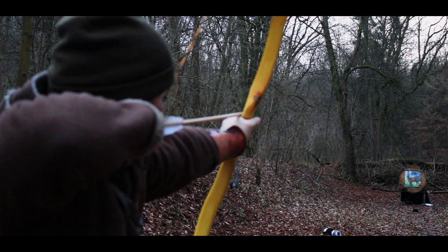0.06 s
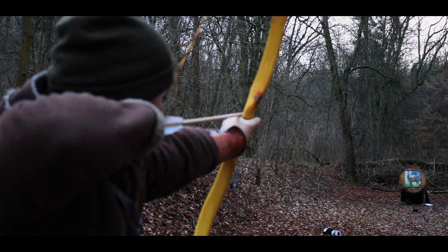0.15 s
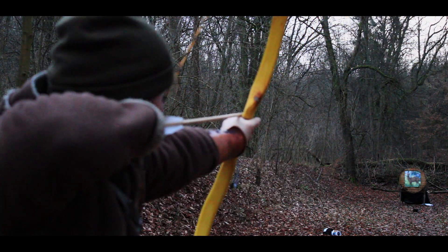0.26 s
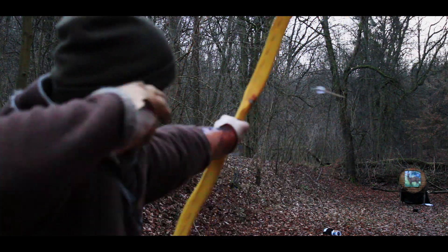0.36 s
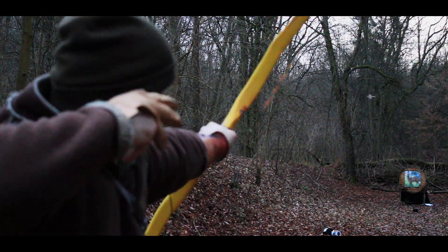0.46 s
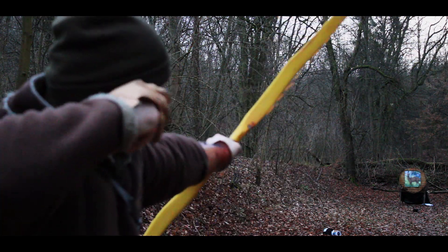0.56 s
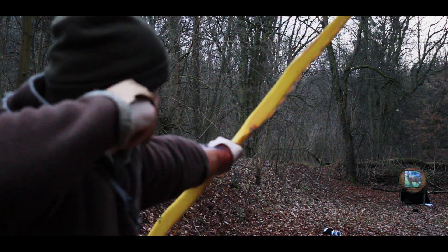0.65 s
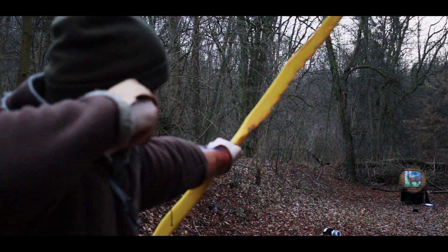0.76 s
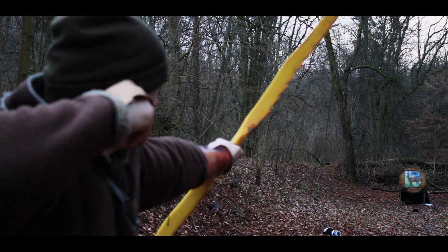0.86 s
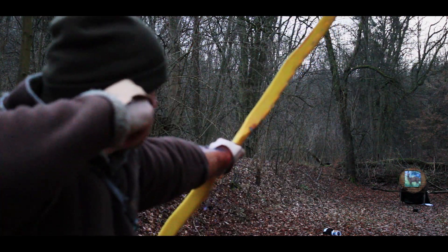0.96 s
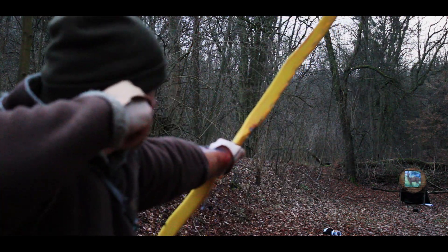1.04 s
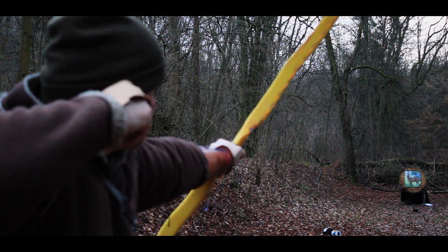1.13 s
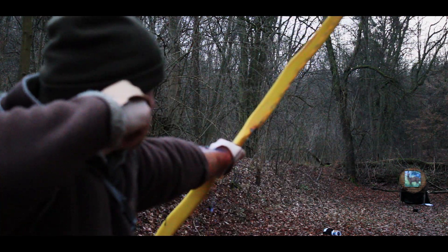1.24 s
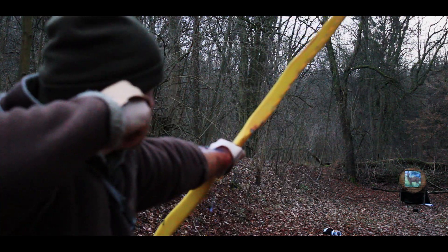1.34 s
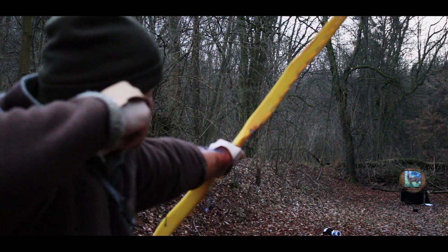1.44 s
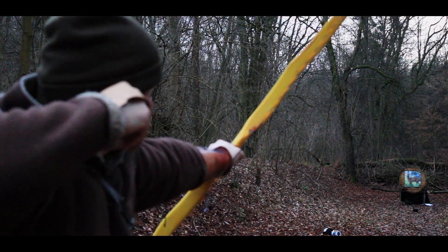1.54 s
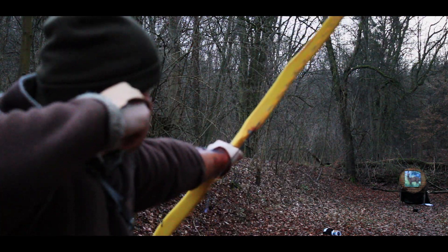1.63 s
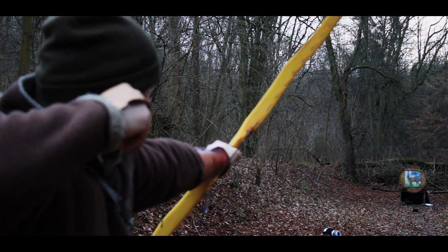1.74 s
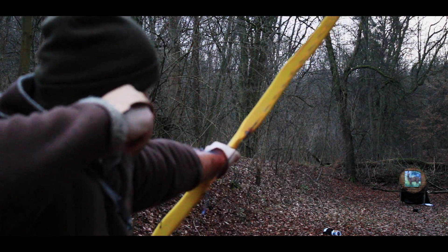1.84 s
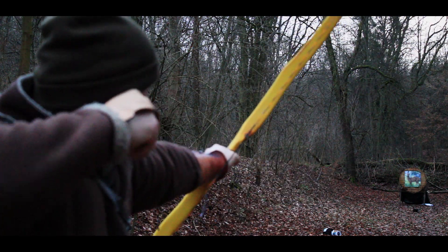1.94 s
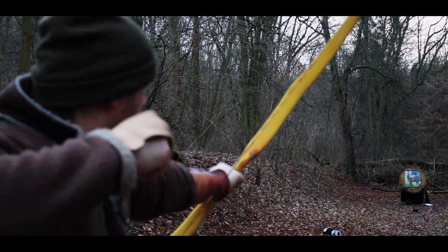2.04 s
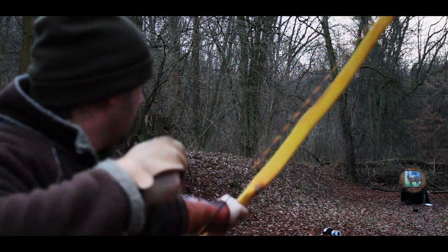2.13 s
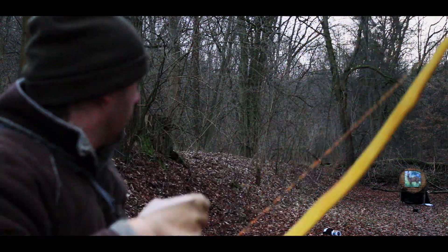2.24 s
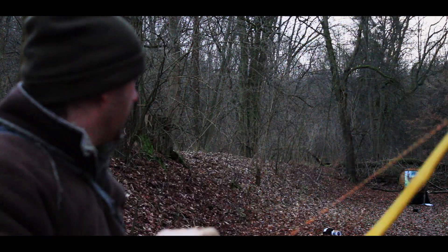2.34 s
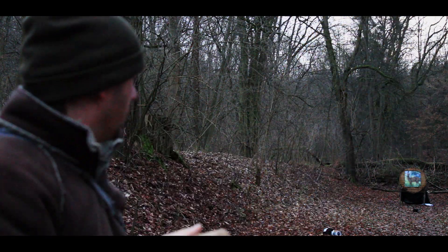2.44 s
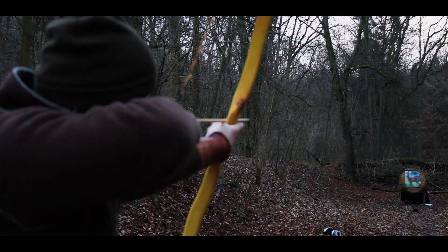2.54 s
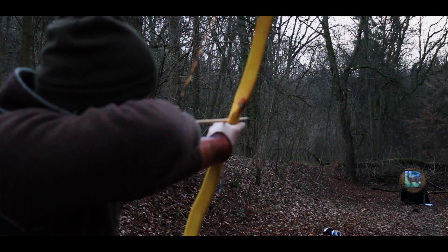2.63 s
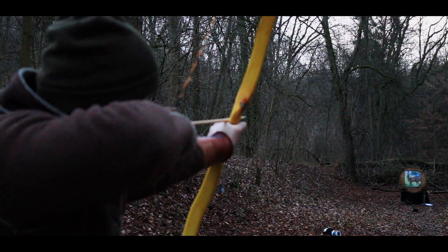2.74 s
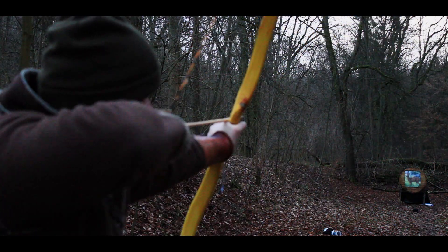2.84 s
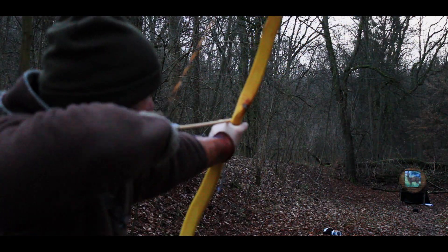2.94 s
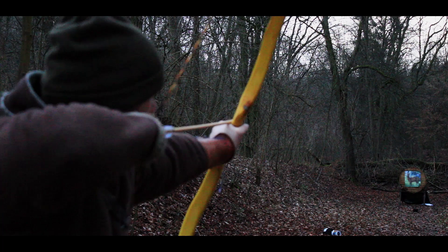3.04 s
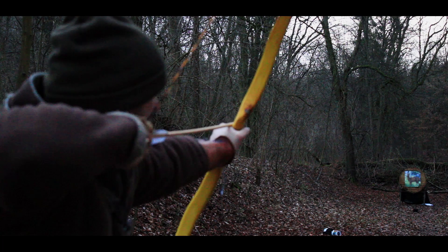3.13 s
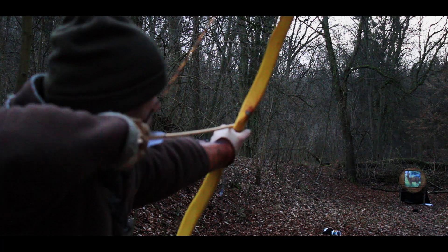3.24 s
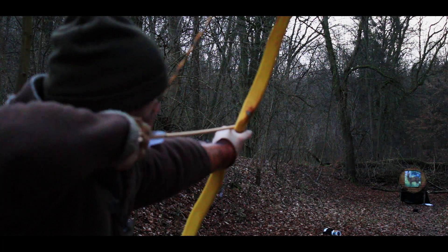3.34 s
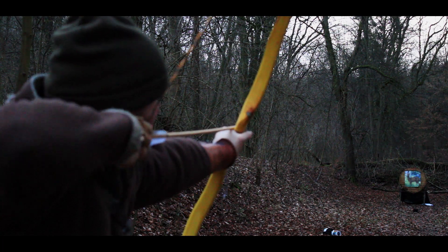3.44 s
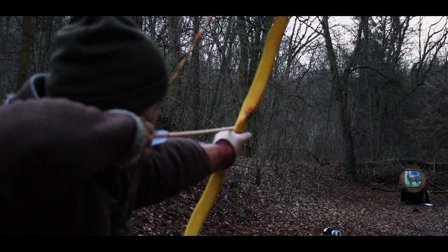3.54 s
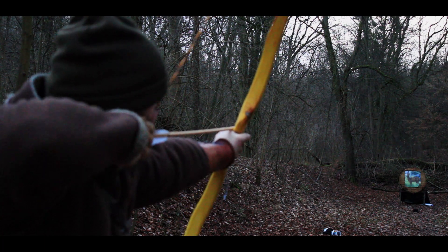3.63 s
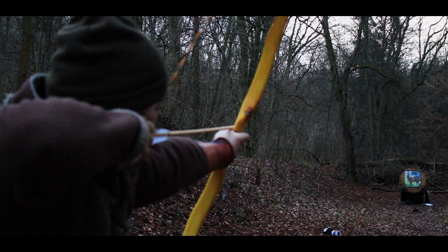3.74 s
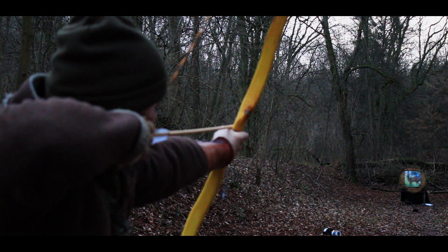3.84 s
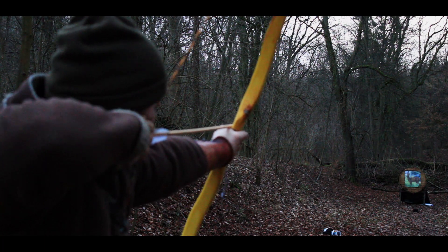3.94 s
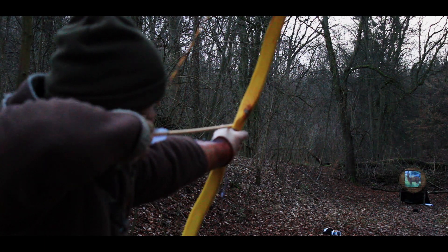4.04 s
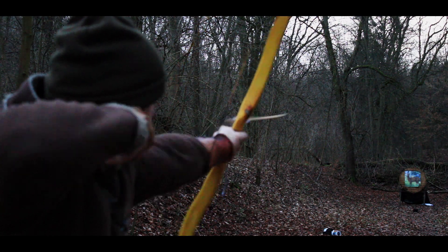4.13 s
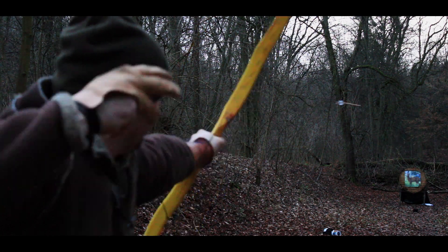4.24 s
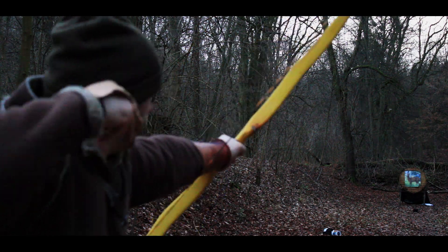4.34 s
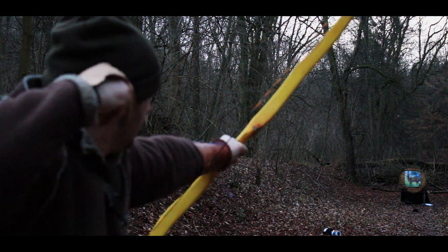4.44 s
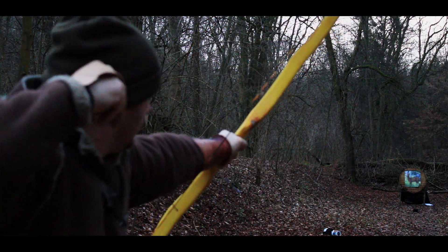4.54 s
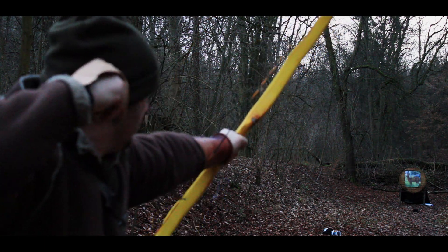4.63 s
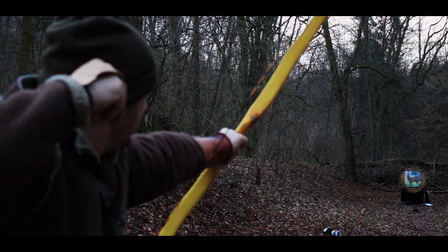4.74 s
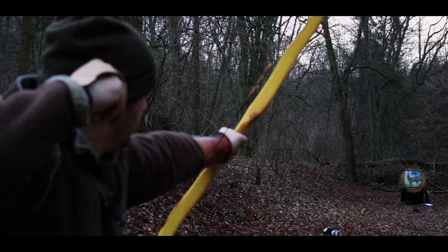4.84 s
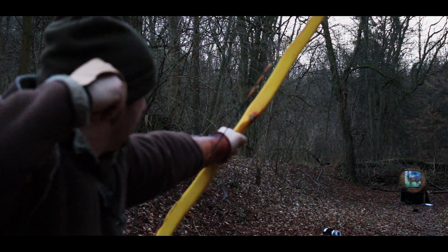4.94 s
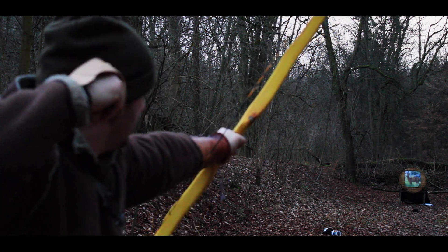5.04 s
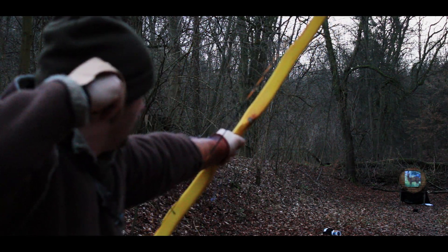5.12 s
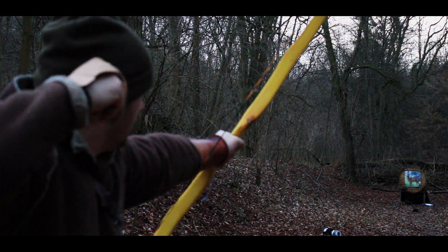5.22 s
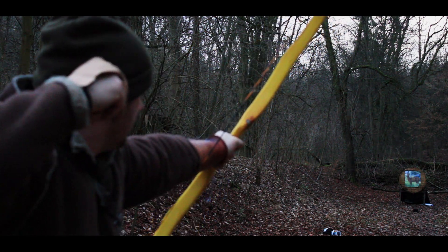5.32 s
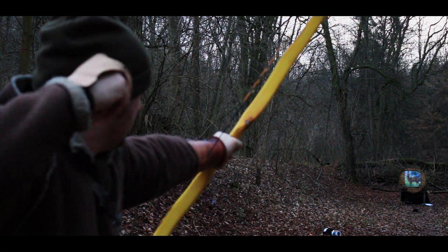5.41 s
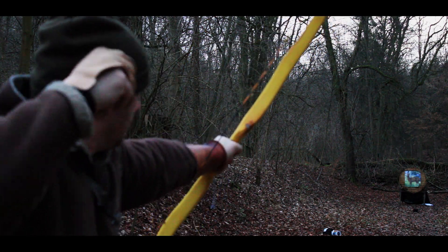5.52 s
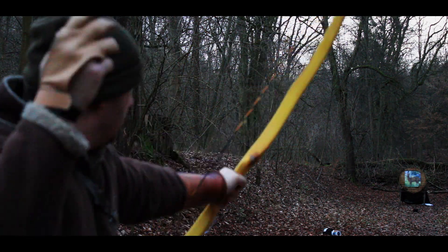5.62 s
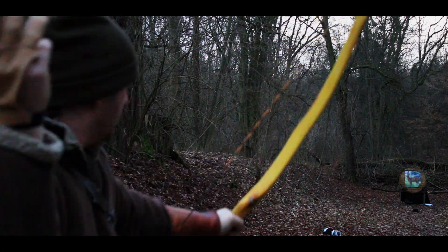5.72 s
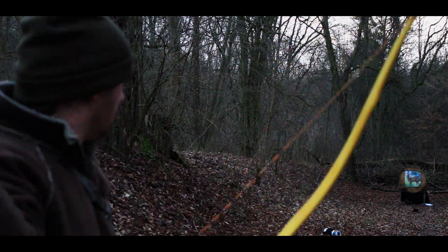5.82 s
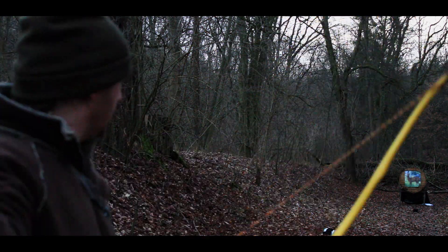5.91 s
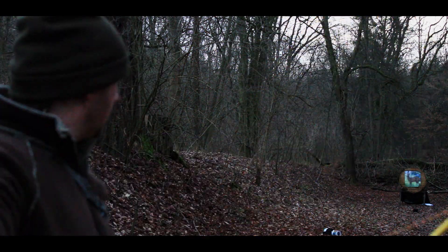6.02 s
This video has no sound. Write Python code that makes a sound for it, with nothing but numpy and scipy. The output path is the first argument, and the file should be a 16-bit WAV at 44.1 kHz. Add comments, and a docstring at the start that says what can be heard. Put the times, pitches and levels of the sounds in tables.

```python
"""An archer in a quiet winter forest, close to the microphone, shoots two arrows from a wooden bow.
Faint ticks and a light breeze lead to the first shot: the string slips off the glove (noise burst, ringing modes),
slaps home and rebounds. Low puffs of wind follow; a second later the arrow knocks into a far target (coloured
clicks), a slope and the trees echo it, and the shaft's thin ring lingers (blurred sine). Clicks and a soft rustle
of the jacket lead to the second shot; cloth and clicks, a second knock, a far bird's whistle (blurred sine), then
clacking spare arrows and rustling cloth close it."""
import sys
import numpy as np
from scipy import signal
from scipy.fft import rfft, irfft, next_fast_len
from scipy.io import wavfile
from scipy.ndimage import uniform_filter1d

SR = 44100
rng = np.random.default_rng(int(sys.argv[2]) if len(sys.argv) > 2 else 0)


def generate_wav(sig):
    """Save sig (samples, or channels by samples) to the path in sys.argv[1] as 16-bit PCM at SR."""
    pcm = np.round(np.clip(np.atleast_2d(sig).T, -1, 1) * 32767).astype(np.int16)
    wavfile.write(sys.argv[1], SR, pcm)


N = 267687
TIME = np.arange(N) / SR


def amp(db):
    """Turns dB into an amplitude factor."""
    return 10 ** (np.asarray(db) / 20)


def read(points, hz):
    """Reads a table joined by straight lines on a log-frequency axis."""
    f, value = np.transpose(points)
    return np.interp(np.log(hz + 1), np.log(f), value)


def add(mix, s, sound):
    """Lays a sound into the mix at time s."""
    part = mix[round(s * SR):][:len(sound)]
    part += sound[:len(part)]


def noise(spectrum):
    """Noise of rms 1 with the given colour."""
    size = next_fast_len(N)
    gain = amp(read(spectrum, np.fft.rfftfreq(size, 1 / SR)))
    x = irfft(rfft(rng.standard_normal(size)) * gain, size)[:N]
    return x / x.std()


def drift(rate_hz):
    """A random wander: normal draws, rate_hz of them a second, joined by straight lines."""
    knots = rng.standard_normal(N // 8)
    return np.interp(TIME * rate_hz, np.arange(len(knots)), knots)


def swell(s, rise, fall):
    """An envelope that grows exponentially to 1 at time s and dies away; time constants in seconds."""
    return np.exp(-np.maximum((s - TIME) / rise, (TIME - s) / fall))


def hump(s, half):
    """A bell-shaped envelope that peaks at 1 at time s and is down to 1/e half a length away."""
    return np.exp(-((TIME - s) / half) ** 2)


def ring(modes, pitch=1):
    """Modes of a solid body, each a sine that decays after one blow."""
    t = TIME[:SR // 4]
    return sum(amp(db - 60 * t / t60) * np.sin(2 * np.pi * hz * pitch * t) for hz, db, t60 in modes)


def pulse(spectrum, tilt_db, size=4096):
    """A causal (minimum-phase) click of energy 1 with the given colour, tilted in dB an octave."""
    hz = abs(np.fft.fftfreq(size, 1 / SR))
    log_gain = np.log(amp(read(spectrum, hz) + tilt_db * np.log2((hz + 100) / 1500)))
    x = np.fft.ifft(np.exp(np.conj(signal.hilbert(log_gain)))).real
    return x / np.linalg.norm(x)


# Colour of the scatter from the trunks. Each row: frequency in Hz, level in dB.
TRUNK_COLOUR = [(100, 3), (400, 3), (1200, 2), (2400, 0), (3300, 2.5), (4500, 1.5), (7000, 1), (14000, -2)]
# How long the scatter lasts. Each row: frequency in Hz, time to fall by 60 dB in seconds.
TRUNK_T60 = [(100, 0.53), (600, 1.76), (1500, 1.37), (3500, 1.01), (7000, 0.92), (14000, 0.2)]


def forest(x, build_s, bright_db, bank_s, bank_db, bank_width_s, lumpy_db):
    """Countless trunks scatter the sound into an even wash; a bank behind them returns a broad swell."""
    hz, t, z = signal.stft(x, SR, nperseg=256)
    power = uniform_filter1d(abs(z) ** 2, size=5, axis=0)
    lag = t[t < 1]
    bank = amp(bank_db) * np.exp(-((lag - bank_s) / bank_width_s) ** 2)
    arrivals = (1 - np.exp(-lag / build_s)) * (1 + bank)
    colour_db = read(TRUNK_COLOUR, hz) + bright_db * np.log2(1 + hz / 3000)
    fall_db = 60 * lag / read(TRUNK_T60, hz)[:, None]
    decay = (arrivals * amp(colour_db[:, None] - fall_db)) ** 2
    # the power is smeared over time, then carried by fresh noise
    wash = abs(signal.fftconvolve(power, decay / decay.sum(1).max(), axes=1)[:, :len(t)])
    grain = signal.stft(rng.standard_normal(N) * amp(lumpy_db * drift(300)), SR, nperseg=256)[2]
    return signal.istft(np.sqrt(wash) * grain / grain.std(), SR, nperseg=256)[1][:N]


# Colour of the far hush. Each row: frequency in Hz, relative level in dB per Hz.
HUSH = [(12, -49.5), (20, -14.5), (65, -2), (116, -3.5), (187, -8), (319, -7.5), (738, -12.5), (825, -13.5),
        (1000, -14.5), (1370, -17.5), (1710, -23), (3160, -26.5), (8650, -35.5), (14300, -50), (16000, -62)]
HUSH_DB = -46
# Spells of light, uneven breeze. Each row: middle in seconds, level in dB, half length in seconds.
BREEZE_SPELLS = [(.15, -45, 0.38), (1.71, -51.5, 0.59)]
# The strongest puffs of wind on the microphone. Each row: middle in seconds, level in dB.
WIND_PUFFS = [(1.163, -35), (1.345, -31.5), (1.645, -39.5), (1.972, -34.5), (2.13, -42)]
PUFF_HALF_S = 0.03
# Low colour of wind on the microphone. Each row: frequency in Hz, level in dB.
BUFFET_COLOUR = [(15, 3.5), (40, -1.5), (80, 1.5), (150, -8), (250, -14.5), (600, -66), (3000, -66)]


def air(swell_db=-0.89, lumpy_db=4, lumps_hz=18):
    """The far hush of the woods wavers slightly; wind buffets the microphone in lumpy spells and low puffs."""
    breeze = sum(amp(db) * hump(s, half) for s, db, half in BREEZE_SPELLS)
    breeze = breeze * amp(lumpy_db * drift(lumps_hz))
    puffs = sum(amp(db) * hump(s, PUFF_HALF_S) for s, db in WIND_PUFFS)
    hush = amp(HUSH_DB + swell_db * drift(4.19)) * noise(HUSH)
    return hush + np.hypot(breeze, puffs) * noise(BUFFET_COLOUR)


# Thin far tones: the first row is the arrow shaft's faint ring lingering among the trees, the second a far bird.
# Each row: middle in seconds, pitch in Hz, level in dB, half length in seconds.
FAR_TONES = [(1.82, 4630, -61.5, 0.09), (5.816, 3230, -55.5, .04)]


def shaft_ring_and_bird(blur_hz=170):
    """A lingering shaft ring, later a bird's whistle: sines randomly modulated, blurred by the trees."""
    blur = drift(blur_hz) + 1j * drift(blur_hz)
    tones = 0
    for s, hz, db, half in FAR_TONES:
        tone = (blur * np.exp(2j * np.pi * hz * TIME)).real
        tones = tones + amp(db) * hump(s, half) * tone
    return tones


# Slow arm movements: drawing, following through, lowering the bow.
# Each row: peak in seconds, level in dB, rise and fall time constant in seconds.
ARM_MOVES = [(3.22, -57.5, 0.093), (4.39, -44.5, 0.073), (6.05, -46.5, 0.054)]
# The sleeve catching and slipping. Each row: peak in seconds, level in dB, fall time constant in seconds.
SLEEVE_RUBS = [(4.336, -32.5, 0.014), (4.384, -25.5, 0.0065), (4.411, -38.5, .012), (4.429, -34.5, 0.0051),
               (5.923, -42.5, .014), (5.94, -39.5, 0.0085), (5.969, -38.5, 0.052)]
RUB_RISE_S = 0.0013
# Colour of the cloth. Each row: frequency in Hz, level in dB.
CLOTH_COLOUR = [(200, -11), (1200, -7), (2500, 2.5), (5000, 4), (8000, -3.5), (10500, -10), (15000, -38)]


def jacket(grain_db=4, grain_hz=600):
    """Cloth slides as the arm moves, and now and then catches and slips, all in fine grains of noise."""
    sliding = sum(amp(db) * swell(s, length, length) for s, db, length in ARM_MOVES)
    catching = sum(amp(db) * swell(s, RUB_RISE_S, fall) for s, db, fall in SLEEVE_RUBS)
    return np.hypot(sliding, catching) * amp(grain_db * drift(grain_hz)) * noise(CLOTH_COLOUR)


# Spells in which the drawn bow's tackle ticks. Each row: start in seconds, end in seconds.
DRAW_SPELLS = [(0, .36), (2.55, 4.19)]
DRAW_TICKS_PER_S, DRAW_TICK_DB, DRAW_TICK_THIN = 4, -52.5, .55  # thin: share of treble, 0-1


def draw_ticks(spread_db=2):
    """Faint ticks at uneven intervals, one in each slot of a draw: rows of time, level, thin share."""
    slot_s = 1 / DRAW_TICKS_PER_S
    slots = np.concatenate([np.arange(start, end, slot_s) for start, end in DRAW_SPELLS])
    chance = rng.random((N // 1000, 2))
    ticks = []
    for s, (late, size) in zip(slots, chance):
        level_db = DRAW_TICK_DB + spread_db * (2 * size - 1)
        ticks.append((s + late * slot_s, level_db, DRAW_TICK_THIN))
    return ticks


# The sharpest clicks of glove and nock, and one arrow clack at 4.5 s. Each row: time in seconds, level in dB,
# share of thin treble 0-1.
SHARP_CLICKS = [(.326, -43, .2), (2.632, -47.5, .8), (2.642, -46.5, .6), (3.822, -49, 0.7),
                (4.169, -42, .4), (4.3978, -29.5, 0.8), (4.501, -36.5, .4)]
CLICK_FALL_S = 0.0022
# Spare arrows clacking together. Each row: time in seconds, level in dB.
ARROW_CLACKS = [(5.948, -38), (5.9795, -19), (5.9975, -24)]
CLACK_FALL_S, CLACK_THIN = 0.0034, .1  # thin: share of treble, 0-1
# Woody colour of a knocked shaft. Each row: frequency in Hz, level in dB.
WOODY_COLOUR = [(200, -51), (1200, 3.5), (2200, -3), (3300, 10), (4200, 6.5), (5200, 9.5), (7000, -2.5),
                (9500, -27), (15000, -63)]
# Thin treble colour of a tick. Each row: frequency in Hz, level in dB.
THIN_COLOUR = [(500, -37), (3500, -32), (5200, 12), (8000, 4), (11000, -9), (15000, -32)]
# Modes of an arrow shaft, also struck in target(). Each row: frequency in Hz, level in dB, t60 in seconds.
ARROW_MODES = [(3200, -3.5, 0.017), (4770, -3, 0.012), (7030, -22, .016)]


def gear(ping_db=0, ping_pitch=1.08, attack_s=0.00029):
    """Dry noise clicks of the tackle and longer clacks of spare arrows; the woodier, the more a shaft rings."""
    woody, thin, clicks = noise(WOODY_COLOUR), noise(THIN_COLOUR), np.zeros(N)
    blows = [(s, db, share, CLICK_FALL_S) for s, db, share in SHARP_CLICKS + draw_ticks()]
    blows += [(s, db, CLACK_THIN, CLACK_FALL_S) for s, db in ARROW_CLACKS]
    for s, db, share, fall in blows:
        share = np.clip(share, 0, 1)
        colour = np.sqrt(1 - share) * woody + np.sqrt(share) * thin
        clicks += amp(db) * swell(s, attack_s, fall) * colour
        add(clicks, s, amp(db + ping_db) * (1 - share) * ring(ARROW_MODES, ping_pitch))
    return clicks


# Arrows landing. Each row: time in seconds, crack in dB, thud in dB, treble tilt in dB an octave,
# echo in dB re the crack, shaft ping in dB, ping pitch as a factor.
LANDINGS = [(1.5323, 6.5, -21.5, -1.6, -16.5, -19.5, 0.985), (5.2817, 7, -20.5, 1.6, -16.5, -23, 1.09)]
# Colour of the crack. Each row: frequency in Hz, level in dB.
CRACK_COLOUR = [(100, -14), (600, -22.5), (850, -9.5), (1050, 0.5), (1400, 4), (1800, -3), (2350, 3),
                (2900, -18), (3300, -14), (4000, -16.5), (5500, -19.5), (7000, -19), (9500, -30),
                (12000, -50), (15000, -69)]
# Modes of the soft body of the target. Each row: frequency in Hz, level in dB, t60 in seconds.
TARGET_MODES = [(136, -13.5, 0.063), (212, 1, 0.034)]
ECHO_S, GROUND_S = .31, .013  # delays of the far slope and of a near bounce


def target(pierce_s=.0007, pierce_db=-12, sink_db=-26, sink_at_s=0.0015, sink_s=0.0021, ping_s=0.000703,
           thud_s=0.00356, ground_db=-20, echo_tilt_db=-5.5, smear_db=-27):
    """The point cracks the skin, the shaft scrapes in and pings, the body thuds; a far slope echoes it."""
    knocks, pings, scrape = np.zeros(N), np.zeros(N), noise(CRACK_COLOUR)
    for s, db, thud_db, tilt_db, echo_db, ping_db, pitch in LANDINGS:
        crack = -amp(db) * pulse(CRACK_COLOUR, tilt_db)
        add(knocks, s, crack)
        add(knocks, s + pierce_s, amp(pierce_db) * crack)  # the point breaks through
        add(pings, s + ping_s, amp(ping_db) * ring(ARROW_MODES, pitch))
        knocks += amp(db + sink_db) * swell(s + sink_at_s, .0002, sink_s) * scrape
        add(knocks, s + GROUND_S, amp(ground_db) * crack)
        add(knocks, s + thud_s, amp(thud_db) * ring(TARGET_MODES))
        echo = amp(db + echo_db) * pulse(CRACK_COLOUR, tilt_db + echo_tilt_db)
        add(knocks, s + ECHO_S, echo)
        # the rough slope smears the echo
        smear = swell(s + ECHO_S + .001, .0003, 0.00091)
        knocks += amp(db + echo_db + smear_db) * smear * scrape
    return knocks, pings


# The shots. Each row: string slaps home at (seconds), level in dB, travel from the glove in seconds,
# slip off the glove in dB re the slap, slip length in seconds, build of the slap in seconds,
# limb ring in dB re each jerk of the string, smack pitch in Hz.
BOW_SHOTS = [(0.384, -8, .0185, -17, 0.003, .0035, 4.5, 860),
             (4.215, -7.5, .0147, -17, .005, 0.0017, 8, 1580)]
# Colour of the string's bursts. Each row: frequency in Hz, level in dB.
SNAP_COLOUR = [(60, -24), (200, -6), (380, 0.5), (700, 0.5), (1000, -4), (1600, -2), (3500, -5), (4800, -7),
               (6500, -8), (9000, -16), (12000, -30.5), (16000, -43)]
# Modes of limbs and string. Each row: frequency in Hz, level in dB, t60 in seconds.
LIMB_MODES = [(184.3, -14.5, 0.064), (254, -22, 0.072), (476, -13, 0.053), (550, -19.5, 0.046),
              (700, -18, 0.063), (977, -25, 0.087), (1150, -28, 0.071), (1410, -32, 0.04),
              (1565, -18.5, 0.068), (1713, -21.5, 0.1), (1970, -27, 0.1), (2120, -16, 0.043),
              (3040, -18, 0.036), (3390, -24, 0.044), (3947, -41, 0.047), (5500, -28, 0.067),
              (7540, -44, 0.11), (8000, -45, .1)]
# The leather glove as the string slips off it.
# Each row: frequency in Hz, level in dB re the slip, t60 in seconds.
GLOVE_MODES = [(376, 4.5, 0.016), (1700, 11.5, .007)]
# the slap stops short; one swing later the string comes back, softer and blurred
STOP_S, SWING_S, REBOUND_DB, REBOUND_S = 0.0019, .0264, -24, 0.011
SMACK_DB = 7  # string on leather, re the slap


def bow(rattle_db=-8, rattle_s=0.013, buzz_db=-27, buzz_s=0.026, smack_t60=0.0061, low_cut_hz=130, order=4):
    """Each shot jerks the string thrice (slip, slap, rebound): a sharp burst rattles on and rings the limbs."""
    power, body, limbs = np.zeros(N), np.zeros(N), ring(LIMB_MODES)
    for home, db, travel, slip_db, slip_s, build_s, limb_db, smack_hz in BOW_SHOTS:
        slip = (home - travel, db + slip_db, slip_s, slip_s)
        slap = (home, db, build_s, STOP_S)
        rebound = (home + SWING_S, db + REBOUND_DB, REBOUND_S, REBOUND_S)
        for s, jerk_db, rise, fall in (slip, slap, rebound):
            burst = np.exp(-np.maximum((s - TIME) / rise, (TIME - s) / fall) ** 2 / 2)
            rattle = amp(rattle_db) * swell(s, rise / 2, rattle_s)
            buzz = amp(buzz_db) * swell(s, rise, buzz_s)
            power += amp(jerk_db) ** 2 * (burst ** 2 + rattle ** 2 + buzz ** 2)
            add(body, s, amp(jerk_db + limb_db) * limbs)
        add(body, home - travel, amp(db + slip_db) * ring(GLOVE_MODES))
        add(body, home, ring([(smack_hz, db + SMACK_DB, smack_t60)]))
    # the body's ring is cut below the low bass
    low_cut = signal.butter(order, low_cut_hz, "highpass", fs=SR, output="sos")
    radiated = signal.sosfilt(low_cut, body)
    return noise(SNAP_COLOUR) * np.sqrt(power) + radiated


def scene(sideways_db=6):
    """The near bow is almost dry; the far target comes with much more forest."""
    near = bow() + gear() + jacket()
    knocks, pings = target()
    near_wash = amp(-20.0) * forest(near, build_s=.014, bright_db=3, bank_s=0.188, bank_db=-10,
                                    bank_width_s=0.023, lumpy_db=0.5)
    # a shaft seen end-on sends most of its ring sideways into the trees
    into_trees = knocks + amp(sideways_db) * pings
    far_wash = amp(-10.0) * forest(into_trees, build_s=0.0014, bright_db=0.5, bank_s=0.15, bank_db=-27,
                                   bank_width_s=0.012, lumpy_db=2.0)
    return (near + near_wash + knocks + pings + far_wash + air() + shaft_ring_and_bird())[None]


def record(dry, edge_hz=15800):
    """Whatever exceeds full scale clips; then a steep low-pass limits the band."""
    low_pass = signal.firwin(511, edge_hz, window=("kaiser", 9), fs=SR)
    return signal.oaconvolve(np.clip(dry, -1, 1), low_pass[None], "same")


dry = scene()
out = record(dry)
generate_wav(out)
```